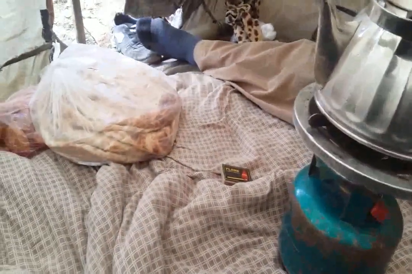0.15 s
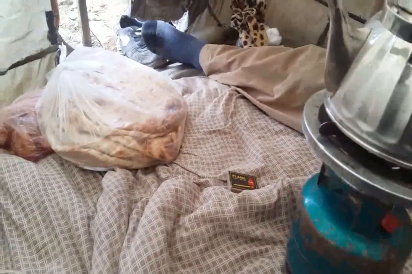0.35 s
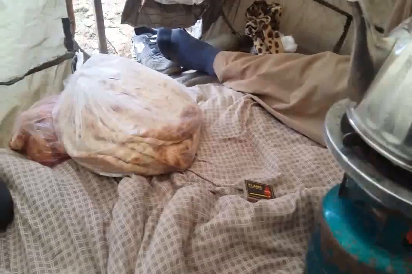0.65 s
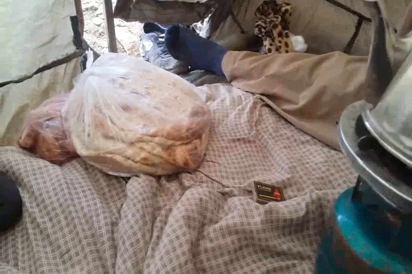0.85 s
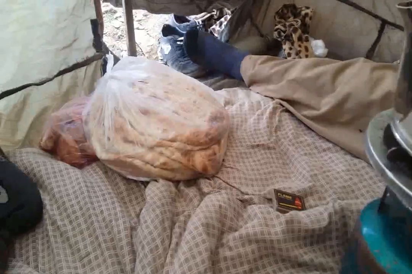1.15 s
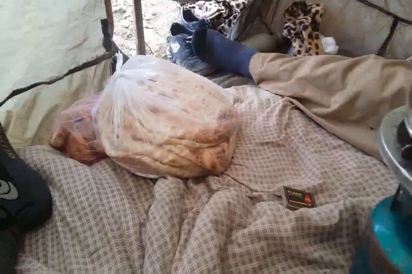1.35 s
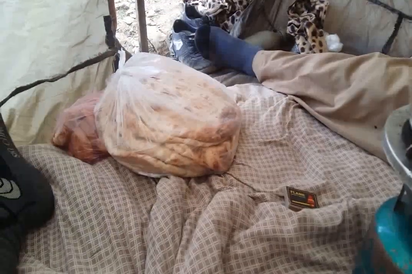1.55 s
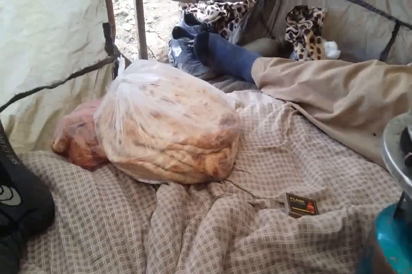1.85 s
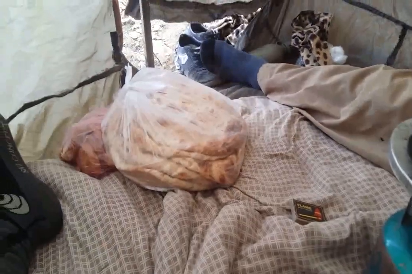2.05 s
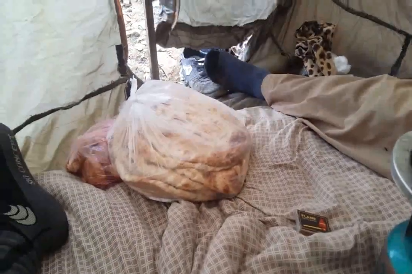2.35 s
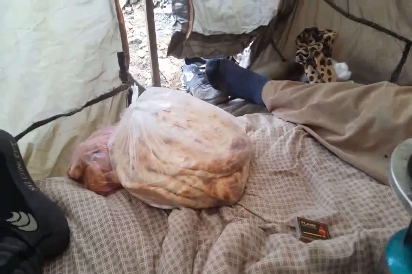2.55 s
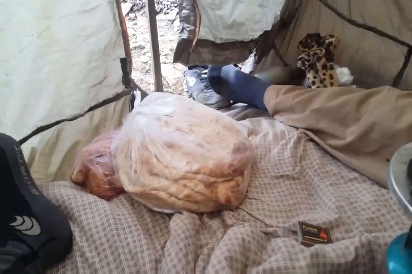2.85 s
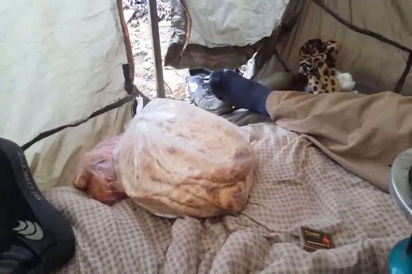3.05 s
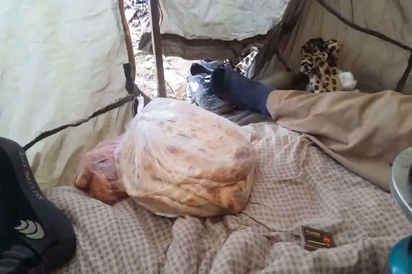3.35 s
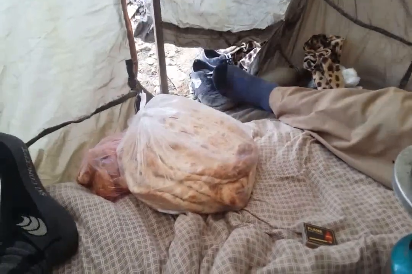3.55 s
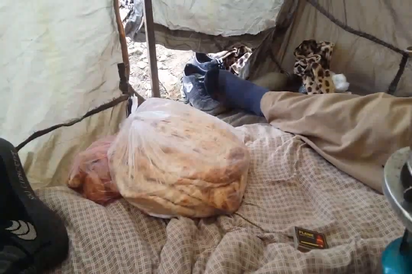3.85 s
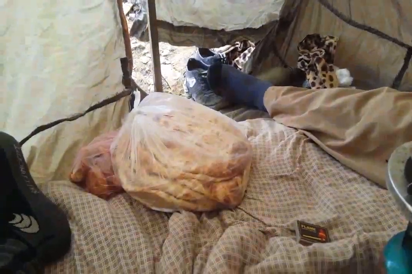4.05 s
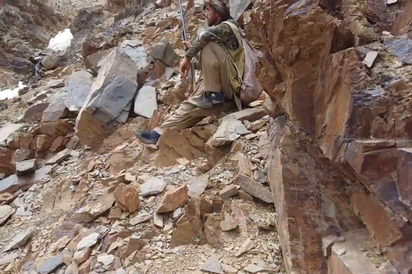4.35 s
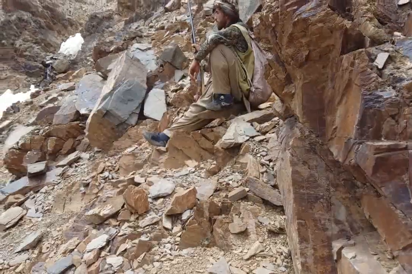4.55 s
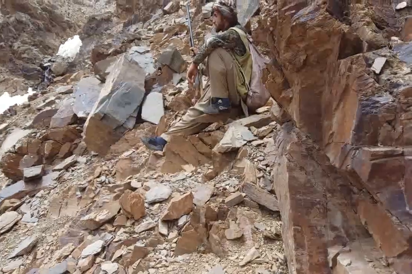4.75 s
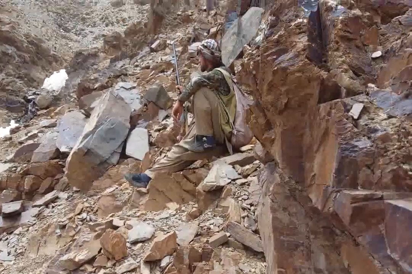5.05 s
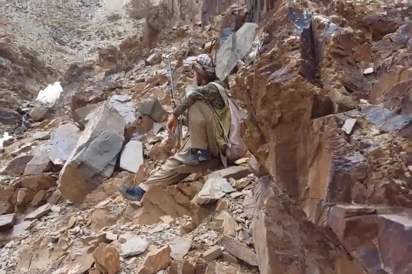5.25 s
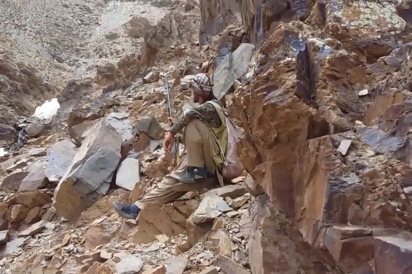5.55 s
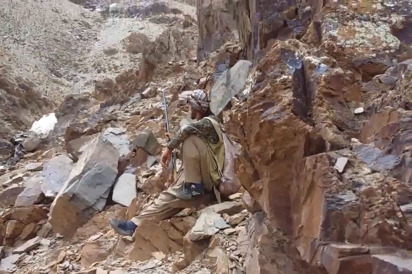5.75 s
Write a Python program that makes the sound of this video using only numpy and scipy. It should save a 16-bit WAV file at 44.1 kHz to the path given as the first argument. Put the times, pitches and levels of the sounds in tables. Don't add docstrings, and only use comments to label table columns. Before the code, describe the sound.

Steady bright gas hiss over a low flame rumble, abruptly stopped; after a brief silence, a breezy rocky slope with buffeting and handling clicks.

```python
import sys
import numpy as np
from scipy import signal
from scipy.fft import dct
from scipy.io import wavfile
from scipy.ndimage import uniform_filter1d

SR = 44100
rng = np.random.default_rng(int(sys.argv[2]) if len(sys.argv) > 2 else 0)


def convert_level_to_amplitude(level_db):
    exponent = np.asarray(level_db, float) / 20
    return 10 ** exponent


def log_audio(samples):
    frames = np.atleast_2d(samples).T
    limited = np.clip(frames, -1, 1)
    pcm = np.round(limited * 32767).astype(np.int16)
    wavfile.write(sys.argv[1], SR, pcm)


N = 260631
T = np.arange(N) / SR


def evened(x):
    return x / np.sqrt(np.mean(x ** 2))


def on_hz(points, hz):
    f, *columns = np.transpose(points)
    return [np.interp(np.log(hz + 1), np.log(f + 1), column)[:, None] for column in columns]


def on_time(rows, t):
    s, *columns = np.transpose(rows)
    return [np.interp(t, s, column) for column in columns]


def white(size):
    noise = rng.standard_normal((2, N)) * np.sqrt(SR / 2)
    return signal.stft(noise, SR, nperseg=size, noverlap=size * 3 // 4)


def sound(z, size):
    return signal.istft(z, SR, nperseg=size, noverlap=size * 3 // 4)[1][:, :N]


def patches(shape, bins, frames):
    field = uniform_filter1d(rng.standard_normal(shape), int(bins), axis=0)
    return evened(uniform_filter1d(field, int(frames), axis=1))


def port_pair(z, like, lag, hz, echoes=0, clear=0):
    early = (1 - np.abs(clear)) * np.exp(2j * np.pi * hz[:, None] * lag / SR) + clear
    early = early / (abs(early) + 1e-9)
    like = np.clip(np.maximum(like, .995 * np.abs(clear)), 0, 1)
    rest = (z[1] + echoes * z[0]) / np.sqrt(1 + np.mean(np.abs(echoes) ** 2))
    return np.array([z[0], like * early * z[0] + np.sqrt(1 - like ** 2) * rest])


def wavelet(s, db, hz, ms, phase):
    turn = 2 * np.pi * hz * (T - s) + phase
    swell = np.exp(-(1500 * (T - s) / ms) ** 2)
    return convert_level_to_amplitude(db) * swell * (np.cos(turn) + 0.1 * np.sin(2 * turn))


def air(size=512):
    # (frequency [Hz], left level [dB per Hz], right minus left [dB])
    air_colour = [(296.5, -89.5, -1), (506, -86, -1.5), (1020, -88.5, -1.5), (1780, -90.5, 1.5),
                  (3020, -93.5, 5), (4160, -99, 7.5), (5380, -93.5, -2), (6240, -103, -8), (7040, -114, 0),
                  (7750, -117, -8.5)]
    start_db, rise_db, rise_s, rise_width_s = -66, 9.5, 5.385, 0.2
    hz, t, z = white(size)
    left_db, right_db = on_hz(air_colour, hz)
    swell_db = start_db + rise_db * (1 + np.tanh((t - rise_s) / rise_width_s)) / 2
    uneven_db = (1.23 + 2.6 * (hz[:, None] / 6000) ** 2) * patches(z[0].shape, 8, 14)
    both_db = left_db + swell_db + 56 + uneven_db
    gain = convert_level_to_amplitude(np.array([both_db - 1.5, both_db + right_db]))
    return sound(gain * port_pair(z, 0.3, -11, hz), size)


def wind(size=1024):
    # (frequency [Hz], left level [dB per Hz], right minus left [dB])
    wind_colour = [(24.9, -100, -1), (50, -60.5, -13), (82, -63, -12), (119.8, -71.5, -14), (181, -68, -21),
                   (274.2, -74.5, -13), (457, -103.5, -12.5)]
    # (time [s], level [dB])
    gusts = [
        (4.55, -7.5),
        (4.8, -14),
        (4.95, -28),
        (5.1, -12),
        (5.3, -20.5),
        (5.65, -14),
        (5.91, -5.5),
    ]
    # (time [s], level [dB], length [ms])
    puffs = [(4.645, -42.5, 9.9), (4.701, -33, 7.8), (4.726, -45, 9.2), (4.788, -59, 20),
             (4.853, -39, 16.5), (4.879, -37.5, 8.4), (5.02, -47, 17), (5.061, -37.5, 8.6),
             (5.093, -37.5, 3), (5.099, -41, 16), (5.118, -21.5, 5.1), (5.207, -46, 14), (5.352, -48, 8.2),
             (5.396, -44, 10.5), (5.454, -30.5, 8.9), (5.514, -41.5, 23), (5.557, -41.5, 14),
             (5.606, -55, 11), (5.699, -39, 9.8), (5.739, -33, 19), (5.756, -31, 11), (5.824, -36, 7.1),
             (5.851, -40, 5), (5.868, -39, 16), (5.893, -33, 12), (4.682, -34.5, 11), (4.866, -39, 5.4),
             (5.126, -34, 5.1)]
    lee_db, lee_share = -5.5, 0.5
    puff_hz, puff_law = 123, -0.564

    hz, t, z = white(size)
    left_db, right_db = on_hz(wind_colour, hz)
    left_swell_db = on_time(gusts, t)[0]
    right_swell_db = lee_db + lee_share * left_swell_db
    lumps_db = [6.5 * patches(z[0].shape, 24, 3) for _ in z]
    level_db = np.array([left_db + left_swell_db, left_db + right_db + right_swell_db]) + lumps_db
    out = sound(convert_level_to_amplitude(level_db) * (hz[:, None] < 500) * z, size)
    phases = rng.uniform(0, 2 * np.pi, len(puffs))
    for (s, db, ms), phase in zip(puffs, phases):
        out[0] += wavelet(s, db, puff_hz * (ms / 10) ** puff_law, ms, phase)
    return out


def ticks():
    # (time [s], left level [dB], right level [dB], pitch [Hz], dull push on the right [dB])
    touches = [(4.729, -62, -63, 1550, -73), (4.7988, -68, -60, 947, -47), (4.838, -55, -41, 3320, -52),
               (4.855, -62, -48, 947, -43), (5.18, -40, -62, 1421, -50), (5.246, -34.5, -58, 1507, -50),
               (5.377, -36, -54, 1510, -48), (5.5728, -51, -55, 1280, -62), (5.595, -63, -57, 947, -41),
               (5.6425, -53, -26.5, 4050, -41), (5.657, -28.5, -49.5, 1640, -56),
               (5.7248, -29, -54, 1560, -43), (5.85, -31, -48, 1470, -42), (5.894, -56, -59, 2928, -51)]
    out = np.zeros((2, N))
    t = np.arange(600) / SR
    for s, left_db, right_db, hz, push_db in touches:
        ring = sum(share * np.sin(2 * np.pi * ratio * hz * t)
                   for ratio, share in [(1, 0.74), (1.95, 0.42), (3.4, .22)])
        snap = 1.33 * np.exp(-t / 0.00082) * np.minimum(t / 0.00046, 1) * ring
        rattle = 0.58 * np.exp(-t / 0.00015) + 0.093 * np.exp(-t / 0.002)
        snap += rattle * rng.standard_normal(600)
        snap = uniform_filter1d(snap, size=5)
        push = 2.7 * convert_level_to_amplitude(push_db) * (1 - t / 0.0014) * np.exp(-t / 0.0013) * np.minimum(t / 0.00038, 1)
        shell = np.minimum(t / 0.0023, 1) * np.exp(-t / 0.0019) * np.sin(2 * np.pi * 660 * t)
        shell *= 0.45 * convert_level_to_amplitude(left_db)
        at = round((s - .0003) * SR)
        out[:, at:at + 600] += convert_level_to_amplitude(np.array([[left_db], [right_db]])) * snap
        out[:, at:at + 600] += np.outer([.3, 1], push) + np.outer([1, .5], shell)
    return out


def housing():
    hum_hz, hum_s, rise_s, hum_db = 227.3, 3.99, 0.074, -37.5
    turn = 2 * np.pi * hum_hz * T
    tone = np.sin(turn) + convert_level_to_amplitude(-18) * np.sin(2 * turn)
    hum = convert_level_to_amplitude(hum_db) * np.sqrt(2) * tone * np.clip((T - hum_s) / rise_s, 0, 1)
    bump = wavelet(s=4.123, db=-25, hz=140, ms=9, phase=2.3)
    return np.array([0 * T, hum + bump])


def roar(size=4096):
    # (frequency [Hz], level [dB per Hz])
    flame = [(30, -84), (60, -80.5), (95, -70.5), (130, -62), (200, -65.5), (300, -71), (420, -84.5)]
    hz, t, z = white(size)
    level_db = on_hz(flame, hz)[0] + 0.64 + 1.9 * patches(z[0].shape, 6, 4)
    like = .97 - .5 * (hz[:, None] / 400) ** 2
    return sound(convert_level_to_amplitude(level_db) * (hz[:, None] < 430) * port_pair(z, like, 0, hz), size)


def clear_paths(hz, t, tremor):
    # (start [s], end [s], first centre [Hz], last centre [Hz], width [Hz],
    # strength [0-1, + in step, - opposed])
    other_paths = [(-1, 5, 650, 650, 350, .84), (-1, 5, 1060, 1060, 70, .7),
                   (-1, .45, 1450, 1450, 150, .7), (2.2, 5, 1500, 1500, 170, .45),
                   (1.7, 3.8, 4140, 4140, 110, .9), (1.3, 3.7, 2180, 2180, 330, -.25),
                   (.02, .33, 3510, 3540, 150, -1.4), (.33, .42, 3480, 3480, 50, -1),
                   (.41, .46, 3490, 3490, 130, -1.4), (.46, .55, 3630, 3610, 130, -1.4),
                   (.55, 1.35, 3530, 3580, 50, -.85), (.69, .84, 3470, 3470, 100, -1.1),
                   (.02, .46, 4170, 4120, 75, -1.2), (.44, .52, 4050, 4000, 70, -1.1),
                   (.1, .9, 2600, 2480, 50, -.9), (.66, 1.1, 2050, 2000, 40, -.6),
                   (1.11, 1.31, 2000, 1980, 55, -.75), (1.14, 1.26, 2330, 2390, 60, -.8),
                   (.87, .96, 2700, 2850, 60, -1), (1.05, 1.45, 2670, 2980, 50, -.9),
                   (1.6, 2.15, 3130, 2970, 70, -1.05), (1.87, 2.05, 1980, 1960, 60, -1),
                   (2.1, 2.42, 1790, 1860, 50, -.9), (3.3, 3.6, 3130, 3170, 60, -1),
                   (3.7, 4.15, 3200, 3450, 60, -.9), (3.93, 4.1, 3480, 3440, 110, -1.2),
                   (3.97, 4.05, 2700, 2730, 50, -.9)]
    # (start [s], end [s], first centre [Hz],
    # last centre [Hz], width [Hz], strength [0-1, - opposed])
    wandering_path = [(1.26, 1.4, 2300, 2300, 50, -.8), (1.34, 1.38, 2400, 2400, 110, -1.2),
                      (1.48, 2.05, 2400, 2420, 60, -.9), (1.52, 1.63, 2450, 2460, 110, -1.2),
                      (1.99, 2.05, 2460, 2440, 100, -1.2), (2.03, 2.09, 2030, 1960, 150, -1.2),
                      (2.05, 2.38, 2380, 2170, 60, -.8), (2.28, 2.38, 2220, 2180, 90, -1),
                      (2.49, 2.52, 2130, 2130, 200, -1.2), (2.52, 2.58, 2290, 2280, 90, -1.1),
                      (2.62, 2.7, 1950, 1960, 70, -1), (2.69, 2.79, 2300, 2110, 80, -1),
                      (2.8, 2.95, 2180, 2200, 60, -.9), (2.91, 3.07, 2120, 2040, 120, -1.2),
                      (2.96, 2.98, 1880, 1880, 120, -1), (3.07, 3.35, 2100, 2050, 70, -1),
                      (3.22, 3.5, 2500, 2530, 50, -.9), (3.29, 3.35, 2420, 2420, 120, -1.2),
                      (3.35, 3.39, 2160, 2160, 120, -1.2), (3.47, 3.58, 2130, 2120, 120, -1.2),
                      (3.58, 3.66, 1900, 1880, 80, -1), (3.65, 3.95, 2290, 2230, 50, -.8),
                      (3.69, 3.72, 2200, 2200, 110, -1.1), (3.86, 3.95, 2230, 2220, 90, -1),
                      (3.95, 4.15, 2280, 2380, 60, -.9), (4.04, 4.08, 2380, 2380, 100, -1.1)]
    shake_share, edge_s = .004, .02

    pull = np.zeros((len(hz), len(t)))
    near = hz < 4600
    for (start, end, first, last, width, strength), shake in zip(other_paths + wandering_path, tremor):
        centre = np.interp(t, [start, end], [first, last]) * (1 + shake_share * shake)
        opened = np.clip(np.minimum(t - start, end - t) / edge_s + .5, 0, 1)
        now = opened > 0
        shape = np.exp(-((hz[near, None] - centre[now]) / width) ** 4)
        pull[np.ix_(near, now)] += strength * opened[now] * shape
    return np.clip(pull, -1, 1)


def jet(size=1024):
    # (frequency [Hz], left level [dB per Hz],
    # right minus left [dB], likeness of the ports [0-1])
    hiss_facing = [(420, -80, -1.5, 0.6), (550, -69.5, -5, 0.93), (960, -66.5, -4, 0.86),
                   (1240, -73.5, -5, 1), (1650, -68, -0.5, 0.73), (1990, -77, -1.5, 0.25),
                   (2270, -72, 0.5, 0.2), (2600, -70.5, -3.5, 0.23), (3400, -63, -7, 0.94),
                   (3960, -65, -0.5, 0.059), (4800, -55.5, -5.5, 0.2), (5060, -52.5, -5.5, 0.78),
                   (6090, -54, -7.5, 0.23), (6580, -65, -17.5, 0.08), (6890, -80.5, -1, 0.097)]
    # (frequency [Hz], left level [dB per Hz],
    # right minus left [dB], likeness of the ports [0-1])
    hiss_turned = [(430, -81.5, -10.5, 0), (558, -66, -4.5, 0.92), (1003, -69, -5.5, 0.4),
                   (1300, -72.5, -0.5, 0), (1550, -67.5, -2, 0.5), (1858, -72.5, -3, 0.7),
                   (2250, -69.5, 0, 0.55), (2560, -73, -4.5, 0.4), (3450, -62.5, -4.5, 0.2),
                   (4254, -63.5, -3.5, 0), (5248, -50, -4.5, 0.4), (6130, -59, -4.5, 0.5),
                   (6663, -63, -11.5, 0.8), (7380, -90.5, -14, 0)]
    # (frequency [Hz], width [Hz], boost [dB])
    gap_ring = [
        (5096, 250, 2),
        (3730, 550, 2),
        (6800, 280, 7.5),
    ]
    # (time [s], delay of the left port [samples], hiss level [dB])
    camera_turn = [
        (0, 5.15, -30),
        (.55, 7.46, -27),
        (.8, 6.73, -28),
        (1.3, 8.7, -26),
        (2.0, 8, -27),
        (2.3, 7.6, -29),
        (2.95, 9.5, -25.5),
        (3.5, 11.2, -25),
        (3.9, 8.3, -24),
        (4.2, 7.5, -28.5),
    ]
    hz, t, z = white(size)
    shape, pitch = z[0].shape, hz[:, None]
    short = np.clip(pitch / 4000, 0, 1)
    lag, hiss_db = on_time(camera_turn, t)
    shade_db = -2.5 + 0.9 * t
    turned = np.clip((lag - 6.6) / 1.5, 0, 1)
    views = zip(on_hz(hiss_facing, hz), on_hz(hiss_turned, hz))
    left_db, right_db, like = [(1 - turned) * facing + turned * away for facing, away in views]

    grain = patches(shape, 3, 14)
    clear = clear_paths(hz, t, grain[::8]) * np.clip(1.2 + .2 * grain, 0, 1)
    flutter_db = .8 * patches(shape, 12, 11) + 1.1 * short * patches(shape, 80, 2)

    whistle_hz, whistle_width_hz, whistle_db, whistle_right_db = 7470.5, 131.5, -70, -6.5
    start_db, settle_s = 7.5, 0.37
    whistle_level_db = whistle_db + start_db * np.exp(-(t / settle_s) ** 4) + 2 * flutter_db
    whistle = convert_level_to_amplitude(whistle_level_db) * np.exp(-((pitch - whistle_hz) / whistle_width_hz) ** 2)

    hollow_hz, hollow_width_hz, hollow_s, hollow_length_s, hollow_db = 2196, 330.5, 2.16, 1, -4.5
    hollow = np.exp(-((pitch - hollow_hz) / hollow_width_hz) ** 4 - ((t - hollow_s) / hollow_length_s) ** 4)
    ring_db = sum(db * np.exp(-((pitch - f) / width) ** 2) for f, width, db in gap_ring)
    ring_db = ring_db + hollow_db * hollow

    middle = np.exp(-((pitch - 2400) / 1300) ** 2)
    comb_db = (1.5 + 1.4 * middle) * patches(shape, 2, 170)
    echoes = 0.52 * (patches(shape, 3, 170) + 1j * patches(shape, 3, 170))

    left = convert_level_to_amplitude(left_db + ring_db + (hiss_db + 25.5) * (0.4 + 0.12 * short))
    uneven = 1 - abs(clear) ** 2
    right = left * convert_level_to_amplitude(1.5 * uneven * (right_db - short * shade_db))
    gain = np.array([left + whistle, right + whistle * convert_level_to_amplitude(whistle_right_db)])
    gain = gain * convert_level_to_amplitude(flutter_db + comb_db) * (pitch > 380)
    return sound(gain * port_pair(z, like, lag, hz, echoes, clear), size)


def edit():
    cut_s, fade_s, fade_length_s, fade_power = 4.204, 4.56, 0.25, 0.73
    # level [dB], end [s], fall [dB per s]
    level_db, end_s, fall = np.array([(-18, 4.221, 4000), (-20, 4.25, 2000)]).T[:, :, None]
    tail_db = level_db - fall * np.maximum(T - end_s, 0)
    fade = np.clip((T - fade_s) / fade_length_s, 0, 1) ** fade_power
    before = convert_level_to_amplitude(-4 * np.clip(1 + (T - cut_s) / .02, 0, 1))
    return np.where(T < cut_s, before, convert_level_to_amplitude(np.maximum(tail_db, -300)) + fade)


def scene():
    low_cut = signal.butter(4, 48, "high", fs=SR, output="sos")
    tent = signal.sosfilt(low_cut, jet() + roar() + housing())
    slope = air() + wind() + ticks()
    return np.where(T < 4.4, tent, slope) * edit()


def thrifty_rounding(x, pair_db, drop_db, snr_db, chance_db, slope_db=5.5, size=1882):
    bands = np.r_[np.arange(0, 44, 4), np.arange(44, 124, 8), np.geomspace(124, 652, 38).astype(int)]
    window = np.sin(np.pi * (np.arange(2 * size) + .5) / (2 * size))
    padded = np.pad(x, ((0, 0), (size, 2 * size - N % size)))
    frames = np.lib.stride_tricks.sliding_window_view(padded, 2 * size, axis=1)[:, ::size] * window
    a, b, c, d = np.split(frames, 4, axis=2)
    folded = np.concatenate([-c[..., ::-1] - d, a - b[..., ::-1]], axis=2)
    z = dct(folded, type=4, norm="ortho")
    band = np.searchsorted(bands, np.arange(size), "right") - 1
    widths = np.diff(np.r_[bands, size])

    def band_db(v):
        return 10 * np.log10(np.add.reduceat(v ** 2, bands, axis=2) / widths + 1e-30)

    def rotated(v):
        return np.array([v[0] + v[1], v[0] - v[1]]) / np.sqrt(2)

    sum_and_difference_db = uniform_filter1d(band_db(rotated(z)), size=3, axis=1)
    paired = abs(np.diff(sum_and_difference_db, axis=0)) > pair_db
    paired_bins = paired[..., band]

    apart = abs(np.arange(len(bands))[:, None] - np.arange(len(bands)))
    mask_db = (band_db(z)[:, :, None] - slope_db * apart).max(axis=3)
    mask_db = np.where(paired, mask_db.max(axis=0), mask_db)
    step = convert_level_to_amplitude(mask_db - snr_db + chance_db * patches(mask_db.shape, 1, 2))[..., band]
    step = np.where(paired_bins, step[0], step)
    z = np.where(paired_bins, rotated(z), z)

    need = patches(mask_db.shape, 1, 3) + 1.4 * (bands / 652) ** 3
    starved = (need > 1.15) & (bands > 130) & ~paired
    weaker = uniform_filter1d(band_db(z)[::-1] - band_db(z), size=2, axis=1) > drop_db
    z = np.sign(z) * np.floor(abs(z) / step + 0.36) * step * ~(paired & weaker)[..., band]
    z = z * convert_level_to_amplitude(-10 * starved)[..., band]
    z = np.where(paired_bins, rotated(z), z)

    u, v = np.split(dct(z, type=4, norm="ortho"), 2, axis=2)
    unfolded = np.concatenate([v, -v[..., ::-1], -u[..., ::-1], -u], axis=2) * window
    first, second = np.split(unfolded, 2, axis=2)
    return (first[:, 1:] + second[:, :-1]).reshape(2, -1)[:, :N]


def cancelled(x, size=1024):
    middle = x.mean(axis=0, keepdims=True)
    hz, t, common = signal.stft(middle, SR, nperseg=size, noverlap=size * 3 // 4)
    opposed = -clear_paths(hz, t, np.zeros((len(hz), len(t))))
    return x - sound(common * np.clip((opposed - .55) / .45, 0, 1), size)


def top_cut(x):
    return signal.sosfilt(signal.butter(12, 7900, fs=SR, output="sos"), x)


def record(dry):
    thin = cancelled(thrifty_rounding(dry, pair_db=4, drop_db=8, snr_db=1.5, chance_db=3.6))
    kept = np.where(T < 4.19, thin, dry)
    treble_cut = signal.firwin(1001, 7660, window=("kaiser", 9), fs=SR)
    running = np.pad(kept, ((0, 0), (500, 500)), "reflect")
    dull = signal.oaconvolve(running, treble_cut[None], "valid", axes=1)
    offset = np.where(T < 4.4, -.00197, -.0006) * edit()
    return top_cut(dull + offset)


dry = scene()
out = record(dry)
log_audio(out)
```